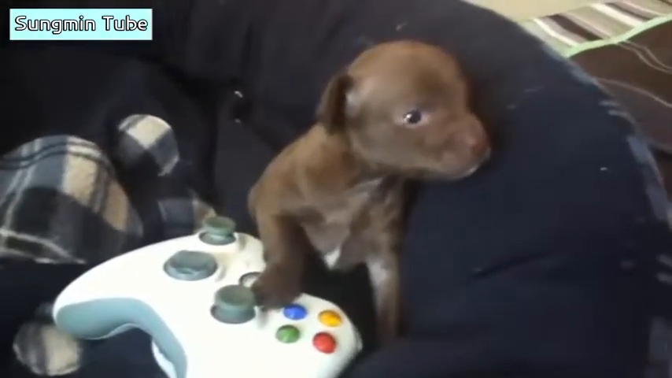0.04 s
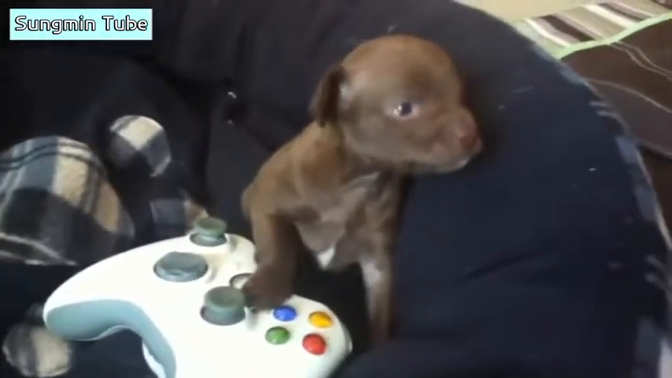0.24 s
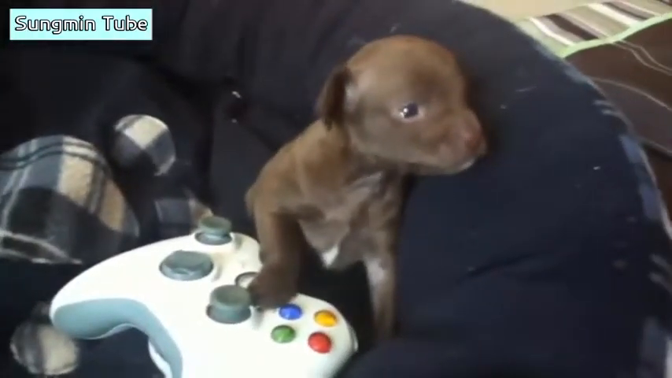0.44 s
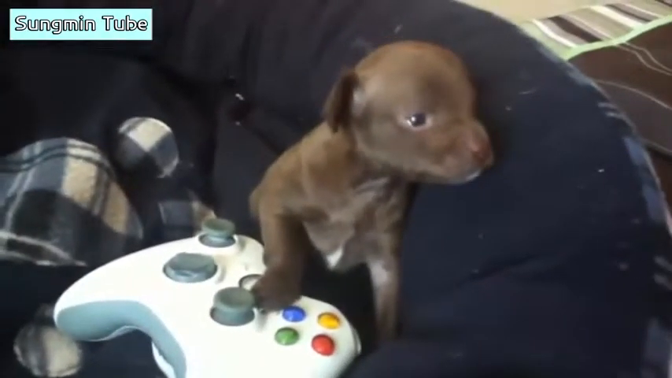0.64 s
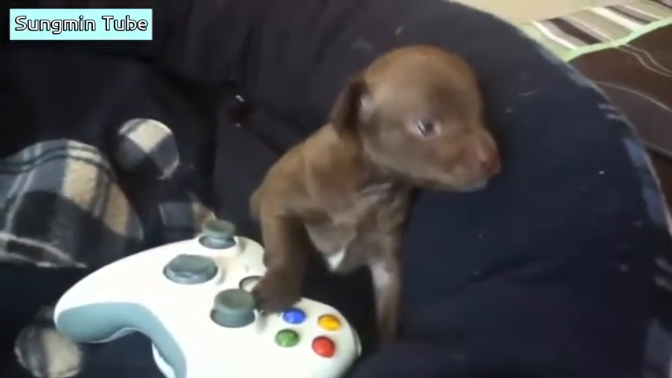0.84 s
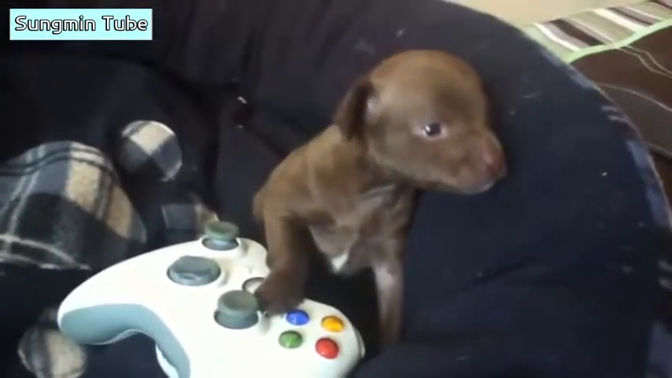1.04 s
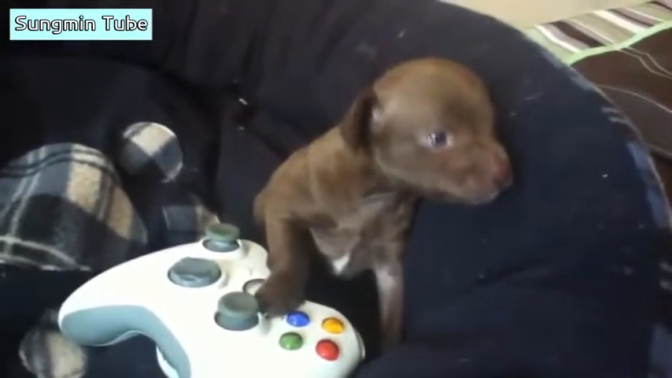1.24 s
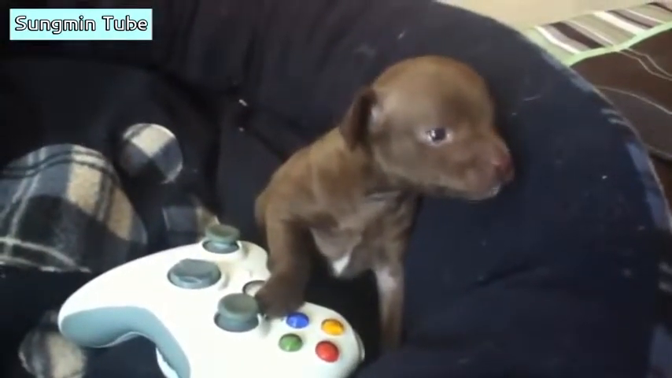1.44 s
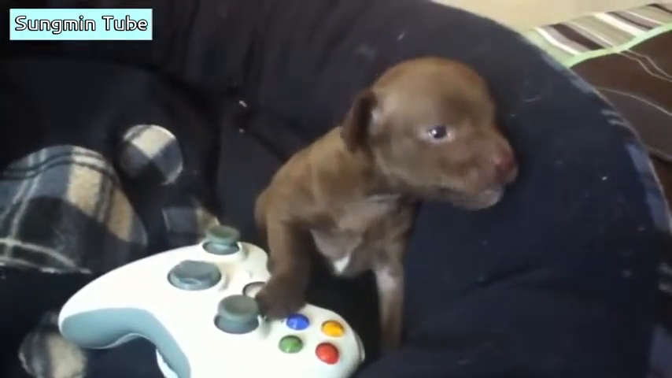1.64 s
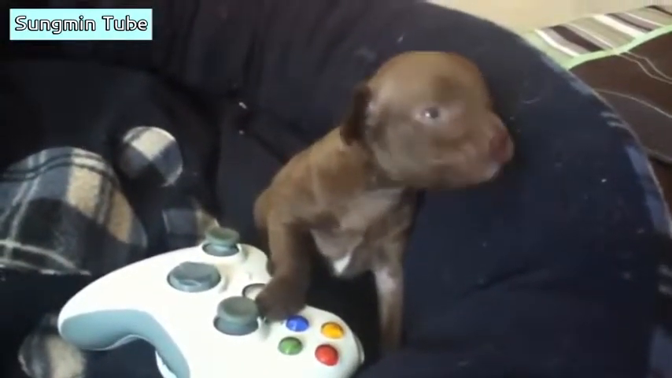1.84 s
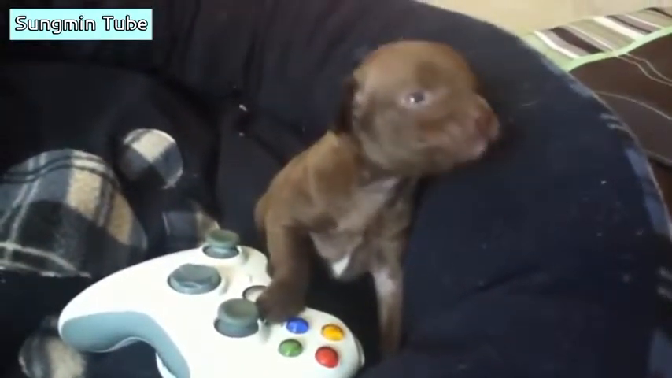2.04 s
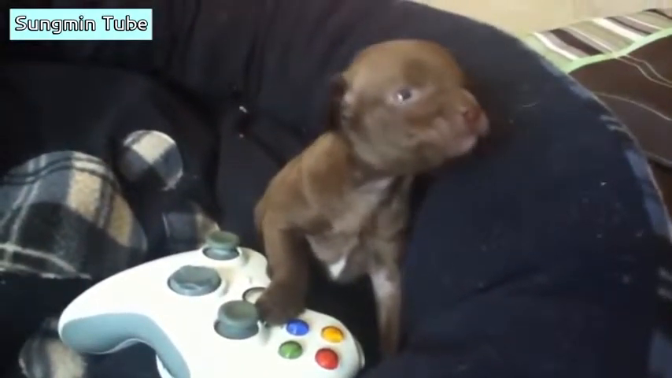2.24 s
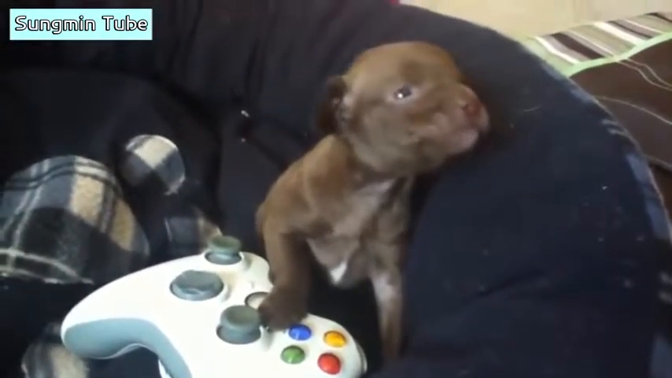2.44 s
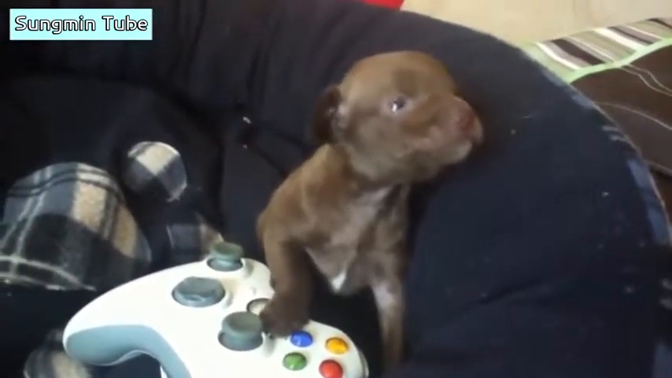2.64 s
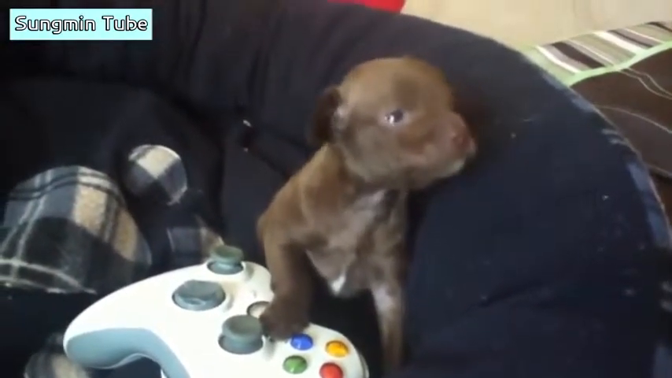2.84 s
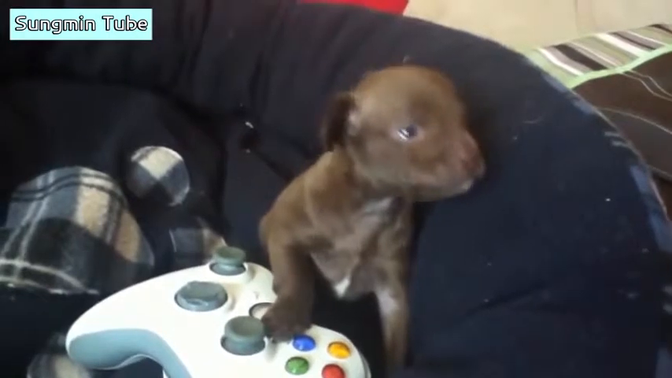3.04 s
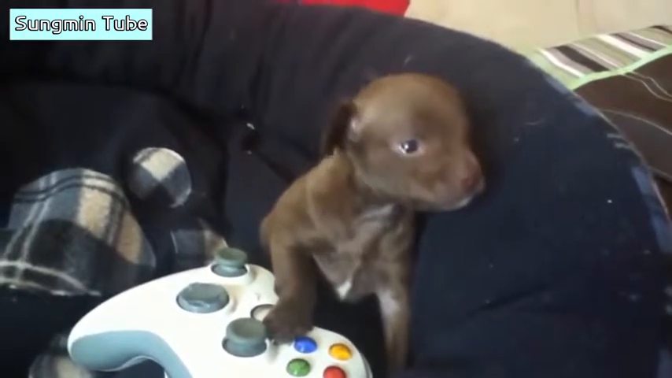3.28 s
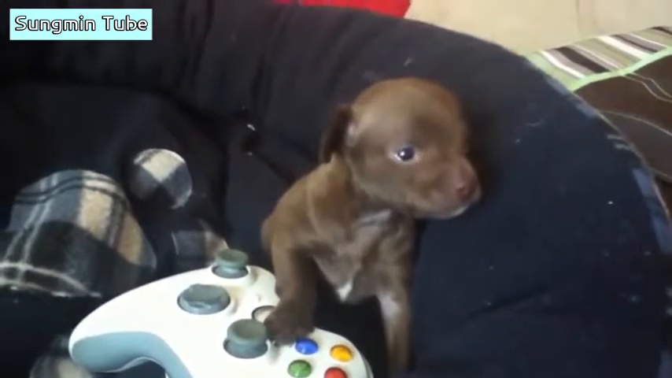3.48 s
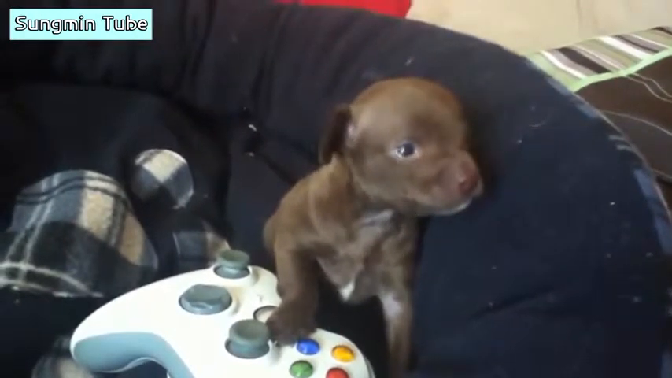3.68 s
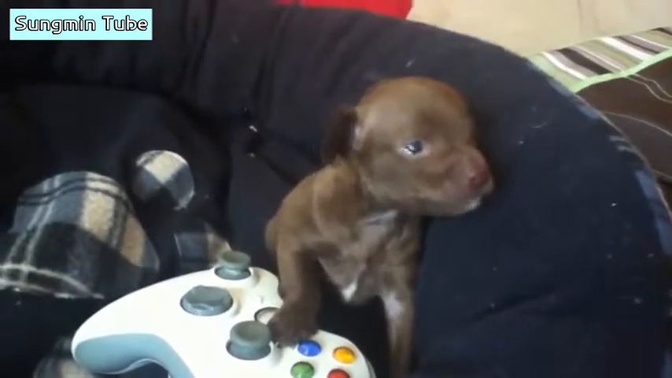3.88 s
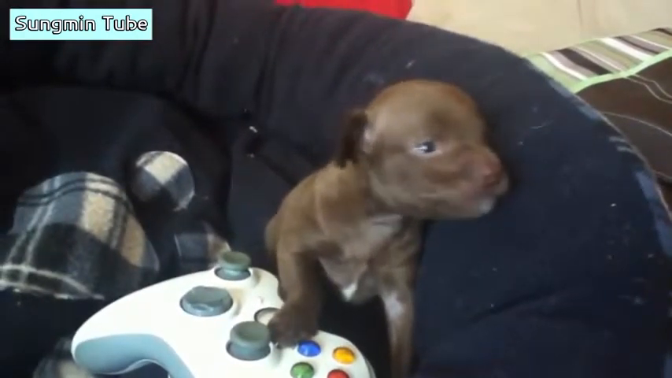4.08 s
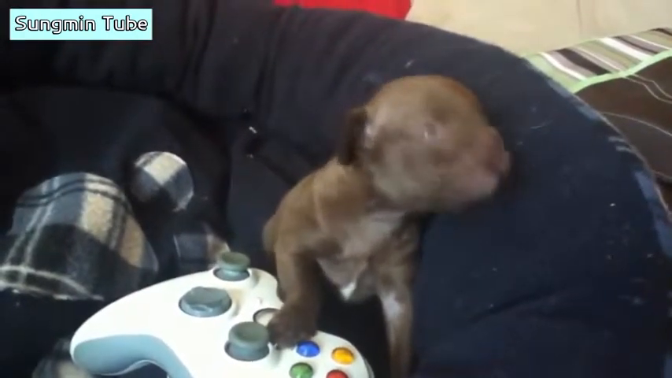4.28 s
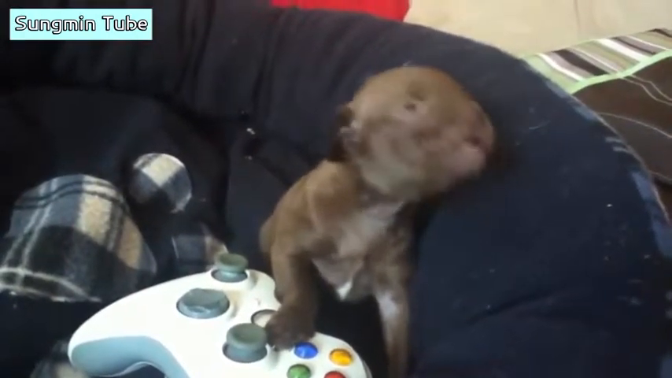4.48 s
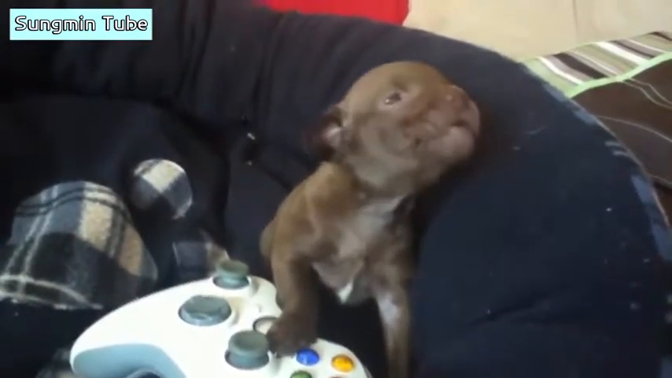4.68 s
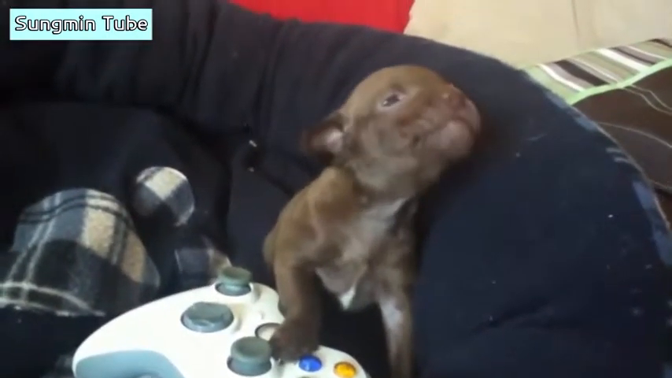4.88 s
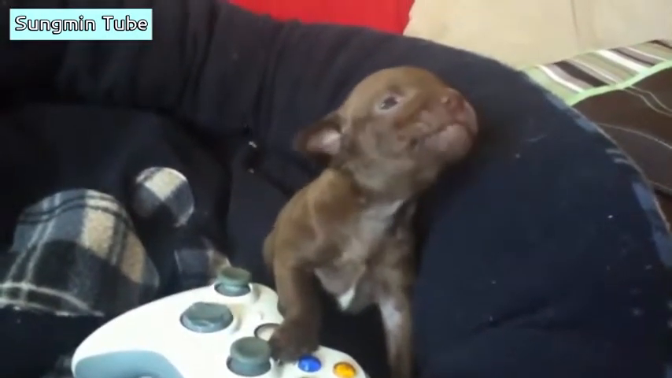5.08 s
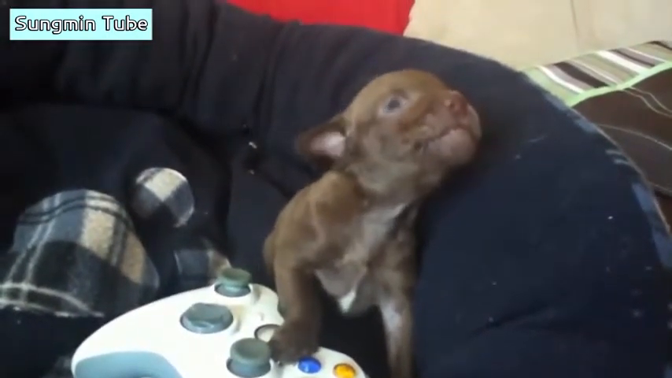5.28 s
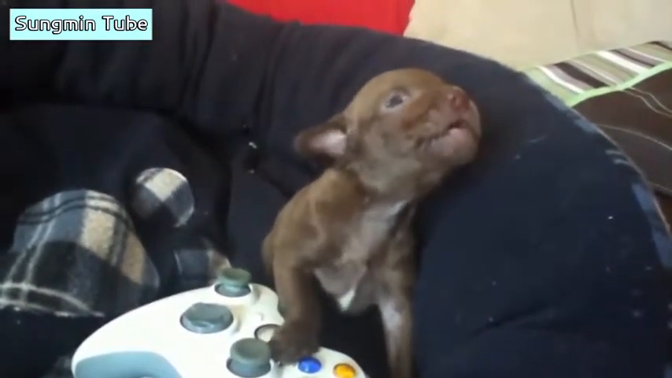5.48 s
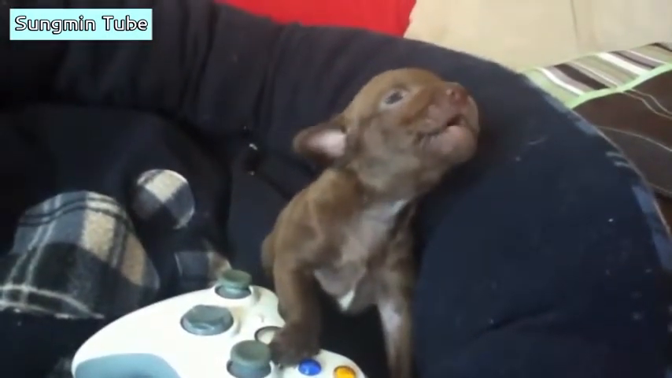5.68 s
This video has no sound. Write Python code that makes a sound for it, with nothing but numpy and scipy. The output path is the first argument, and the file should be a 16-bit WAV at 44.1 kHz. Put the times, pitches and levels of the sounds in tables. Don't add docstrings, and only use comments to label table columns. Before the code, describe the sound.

A very young puppy is heard close up in a small, softly furnished room, over a faint low appliance hum and steady microphone hiss. At 0 to 0.4 s come tiny, muffled closed-mouth grunts, with a slight handling rumble after them. A brief low groan follows at 0.9 s, then a small yip at 1.4 s and a rising one at 1.6 s. At 1.8 s a squeak shoots up into a loud, rough, piercing yelp, peaking around 1.95 s, then cracks down to a falling nasal whine ending at 2.1 s. Faint grunts come at 2.5, 2.7 and 2.9 s, a soft nasal snuffle around 3.1 to 3.2 s, and three more grunts from 3.5 to 3.9 s. A short grumble at 4.1 s leads to a howl at 4.3 s, which climbs with breaks, holds high and clear, then slides down and fades by 5.1 s. After quiet breathing, another low howl starts rising at 5.6 s and is cut off.

```python
import sys
import numpy as np
from scipy import signal
from scipy.fft import rfft, irfft, next_fast_len
from scipy.io import wavfile
from scipy.ndimage import uniform_filter1d, minimum_filter1d, map_coordinates

SR = 44100
rng = np.random.default_rng(int(sys.argv[2]) if len(sys.argv) > 2 else 0)


def invert_db(x):
    u = np.asarray(x, float) / 20
    return 10 ** u


def store_wav(level_fs):
    pcm = np.round(np.clip(np.atleast_2d(level_fs), -1, 1) * 32767)
    wavfile.write(sys.argv[1], SR, pcm.T.astype(np.int16))


N = 252246
CUTOFF_HZ = 15720

# (frequency [Hz], level [dB])
THROAT_SHUT = [(120, -9), (240, 3), (600, 0), (1100, 2), (1350, -2), (1600, -5.5), (2150, 6.5),
               (2600, -6.5), (2900, -13), (3600, -22.5), (4400, -18), (6600, -30), (8200, -11.5),
               (15500, -28)]
# (frequency [Hz], level [dB])
THROAT_OPEN = [(100, 6), (500, -2.5), (1100, 4.5), (1900, 3), (2600, -18.5), (3100, -10), (3500, -7),
               (3800, -15), (4700, -23.5), (5400, -32), (6600, -23), (8200, -6.5), (12000, -26),
               (14000, -39)]


def voice():
    rasp_db, hiss_db = -6.5, -27.0
    bright_base_db, bright_per_effort, bright_per_level = -4.5, -0.18, 0.98
    squeal_hz, squeal_dull_db = 1180, 7
    phrases = cries()
    rows = np.array(sorted(row for phrase in phrases for row in phrase))
    t = np.arange(N) / SR
    controls = [np.interp(t, rows[:, 0], c) for c in rows[:, 1:].T]
    pitch_hz, level_db, effort_db, mouth = uniform_filter1d(controls, round(.004 * SR))
    mouth = np.clip(mouth, 0, 1)
    times = [(p[0][0] - .003, p[-1][0] + 0.0014) for p in phrases]
    sounding = spans(times, np.ones(len(phrases)), 0.004)

    wander = drift(14, count=9) * .8 + drift(55, count=9) * .6
    tremor = np.roll(wander[0], N // 3) * np.sin(2 * np.pi * 45 * t)
    pitch_hz = pitch_hz * (1 + .005 * drift(28, count=1)[0] + .0025 * tremor)
    chaos, depth, divisor = beat_breaks()

    bright_db = bright_base_db + bright_per_effort * (effort_db + 7.5)
    bright_db += bright_per_level * np.minimum(level_db + 9.5, 0) * mouth
    squeal = np.clip((pitch_hz - squeal_hz) / 150 + 1, 0, 1)
    bright_db -= squeal_dull_db * squeal * (1 + 0.51 * chaos)

    cycles = np.cumsum(pitch_hz) / SR
    chance = signal.hilbert(rng.standard_normal(8192))
    strong, early = [map_coordinates(c, [cycles], order=3) for c in (chance.real, chance.imag)]
    subtone = 2 * np.pi * cycles / divisor
    slip_cycles = (.0012 + .13 * chaos) * early + .085 * depth * np.sin(subtone)
    folds = harmonic_stack(sounding, pitch_hz, effort_db, bright_db, mouth, chaos, wander, cycles, slip_cycles)
    folds *= 1 + (.02 + .2 * chaos) * np.tanh(strong)
    folds *= 1 + .62 * depth * np.cos(subtone)

    puff = 1 + 0.15 * np.cos(2 * np.pi * cycles)
    rasp = coloured_noise([(300, -9.0), (1000, 1.0), (3900, -14.0), (5000, -16.0)])
    folds += invert_db(rasp_db) * chaos * puff * rasp
    folds *= invert_db(level_db + .9 * drift(30, count=1)[0]) * sounding
    hiss = coloured_noise([(6000, -48), (7200, -4), (8300, -2.5), (10000, -20), (12500, -0.5),
                           (14500, -18), (16000, -20)])
    hiss *= puff * invert_db(level_db + bright_db + hiss_db) * sounding
    hiss *= 0.043 + 0.52 * (1 - mouth) + uniform_filter1d(chaos, round(.03 * SR))

    pressure = invert_db(level_db) * sounding * np.minimum(0.11 + chaos, 1)
    through_throat = filtered(folds * mouth, THROAT_OPEN) + filtered(folds * (1 - mouth), THROAT_SHUT)
    return through_throat + hiss, pressure, sounding


def cries():
    # (start [s], length [s], peak [dB], pitch [Hz], sag [Hz])
    whimpers = [(-.02, 0.033, -35, 241.3, 20), (0.201, 0.036, -31, 337.8, 70),
                (0.397, 0.026, -29, 285.2, 16), (2.482, 0.024, -34, 289.7, 5.5),
                (2.693, 0.05, -29, 293, 4.1), (2.907, 0.028, -29, 280.5, 21),
                (3.523, 0.025, -33.5, 301, 4.1), (3.732, 0.027, -30.5, 316.4, 12.3),
                (3.922, 0.032, -28, 334.8, 28)]
    # (time [s], pitch [Hz], level [dB], effort [dB/octave], mouth [0 shut to 1 open])
    groan = [(.851, 266.9, -49, -10, 0.085), (.859, 278.7, -32.5, -8.5, 0.0795),
             (.88, 307.8, -26.5, -9, .08), (.908, 261.2, -34.5, -11.5, 0.072), (.924, 245, -30, -15, 0.048),
             (.935, 234.5, -57, -14, .08)]
    grumble = [(4.086, 347.7, -59, -9, 0.13), (4.091, 355.4, -28.5, -5, .12), (4.104, 369.3, -25, -9, .12),
               (4.126, 365.5, -21.5, -10.5, .12), (4.138, 336, -21.5, -12.5, .12),
               (4.143, 293.5, -34, -3.5, 0.14), (4.152, 290, -36, -12, .12), (4.157, 285, -52, -14, .12)]
    yip = [(1.383, 384.6, -42, -7, 0.1), (1.391, 425.7, -24, -12, 0.11), (1.406, 507, -23.5, -7, .11),
           (1.416, 463, -21.5, -5.5, 0.1), (1.42, 425, -24.5, -11, 0.073), (1.426, 420, -32, -11, .09),
           (1.432, 420.5, -57, -3, 0.097)]
    second_yip = [(1.569, 275.8, -46, -13, .06), (1.582, 325.4, -26.5, -6.5, .06),
                  (1.606, 395.5, -22.5, -6, 0.058), (1.627, 436.6, -18.5, -10, 0.055),
                  (1.645, 421.2, -22.5, -8.5, 0.062), (1.654, 342, -26, -13, 0.062),
                  (1.659, 317, -30, -21, 0.066)]
    # (time [s], pitch [Hz], level [dB], effort [dB/octave], mouth [0-1])
    yelp_rise = [(1.798, 327.6, -37, -15, 0.068), (1.802, 342, -35, -9, 0.068),
                 (1.817, 394, -21, -9.5, 0.071), (1.865, 753.8, -14, -7, 0.083)]
    yelp = [(1.871, 925, -14, -2.5, 0.47), (1.886, 1000, -11, -10.5, 0.65), (1.897, 1202, -12.5, -4, 0.73),
            (1.928, 1237, 1.5, -3.5, 0.95), (1.937, 1200, -7, -3.5, 0.87), (1.943, 1032, -12, -6, 0.71),
            (1.95, 1398, 0, -3, 0.65), (1.954, 1250, -9.5, -2.5, 0.52), (1.959, 1234, -2, -3.5, 0.69)]
    yelp_tail = [(1.963, 650, -13.5, -7.5, 0.3), (1.975, 600.5, -17, -8, .09),
                 (2, 548.4, -16.5, -10.5, 0.098), (2.05, 499.6, -16.5, -10, 0.078),
                 (2.081, 465, -17.5, -11, 0.073), (2.093, 405.5, -19.5, -9.5, 0.057),
                 (2.103, 350.5, -40, -9, 0.058)]
    # (time [s], pitch [Hz], level [dB], effort [dB/octave], mouth [0-1])
    howl_onset = [(4.29, 355.3, -39, -8, 0.11), (4.297, 366.3, -23.5, -10.5, 0.096),
                  (4.332, 492.7, -17, -11.5, 0.054), (4.384, 607, -17.5, -7.5, 0.091),
                  (4.389, 767, -17.5, -7, 0.36), (4.42, 785, -14.5, -8.5, 0.25),
                  (4.428, 716, -19.5, -7.5, 0.41), (4.436, 655, -17.5, -8, 0.5),
                  (4.459, 590, -17.5, -8, 0.55), (4.479, 612, -18, -6.5, 0.7), (4.484, 630, -20, -6, 0.52),
                  (4.49, 679, -17, -8.5, .45)]
    howl = [(4.503, 809.6, -15, -8, 0.4), (4.52, 853, -11.5, -8.5, 0.16), (4.56, 900, -13, -7.5, 0.38),
            (4.604, 900, -13, -7.5, 0.52), (4.64, 934, -13.5, -6.5, 0.31), (4.68, 969, -15, -6.5, 0.57),
            (4.738, 956.4, -15, -5, 1), (4.818, 931, -18.5, -3, 0.99), (4.858, 917.6, -14, -8.5, 0.362)]
    howl_fall = [(4.889, 872, -16.5, -4, 0.97), (4.915, 868, -17, -4.5, 0.88),
                 (4.94, 816.4, -15.5, -5, 0.87), (4.98, 811.6, -17.5, -5, 1), (5.008, 744, -22.5, -4, 0.86),
                 (5.015, 733, -20, -6, 0.91), (5.024, 701, -21.5, -5, 0.81),
                 (5.041, 667.5, -23.5, -4.5, 0.98), (5.067, 678, -26.5, -6.5, 0.98),
                 (5.071, 699, -29, -8, .8), (5.074, 834, -26.5, -14, 0.45), (5.08, 817, -31, -18, .4),
                 (5.083, 704, -35, -20, 0.36), (5.098, 690, -42, -20, .33)]
    next_howl = [(5.585, 315, -55, -11, 0.11), (5.591, 320.5, -28.5, -12.5, 0.093),
                 (5.617, 353.6, -23.5, -9.5, 0.14), (5.678, 368.7, -22.5, -10.5, 0.27),
                 (5.7, 410.5, -21, -7.5, 0.23), (5.72, 465.6, -18.5, -10, 0.21)]
    phrases = [short_cry(w) for w in whimpers]
    phrases += [groan, grumble, yip, second_yip]
    phrases += [yelp_rise + yelp + yelp_tail, howl_onset + howl + howl_fall, next_howl]
    return phrases


def short_cry(row):
    attack_s, release_s, fade_db, droop_db = 0.0049, 0.0098, 23, 3.5
    top_at, loudest_at = 0.247, 0.61
    scoop = .2
    grunt_effort_db, effort_per_level, nearly_shut = -11, 0.23, 0.34
    start, length, peak_db, top_hz, sag_hz = row
    t = np.linspace(0, length, num=19)
    rising = t / (top_at * length) - 1
    falling = (t / length - top_at) / (1 - top_at)
    away = np.where(t < top_at * length, rising, falling)
    pitch_hz = top_hz - sag_hz * away ** 2 * np.where(away < 0, scoop, 1)
    fade = np.maximum(1 - t / attack_s, 0) ** 2 + np.maximum(1 - (length - t) / release_s, 0) ** 2
    level_db = peak_db - fade_db * fade - droop_db * (2 * (t / length - loudest_at)) ** 2
    effort_db = grunt_effort_db + effort_per_level * (peak_db + 27)
    return [(start + s, f, d, effort_db, nearly_shut) for s, f, d in zip(t, pitch_hz, level_db)]


def beat_breaks():
    # (start [s], end [s], chaos [0-1], subtone depth [0-1], subtone period [cycles])
    breaks = [(.195, .24, .08, 0, 2), (.39, .425, .12, 0, 2), (.85, .935, .04, 0, 2),
              (4.29, 4.382, .1, 0, 2), (4.402, 4.427, .07, .05, 3), (4.427, 4.45, .12, .1, 3),
              (1.412, 1.421, .4, .6, 2), (1.612, 1.65, .05, .7, 2), (1.866, 1.9, .7, .5, 3),
              (1.9, 1.922, .75, .3, 2), (1.922, 1.946, .1, .03, 2), (1.946, 1.954, .55, .5, 3),
              (1.954, 1.961, .4, .8, 2), (1.8, 1.866, .1, 0, 2), (1.962, 1.986, .05, .05, 2),
              (1.986, 2.02, .05, .1, 2), (2.02, 2.088, .03, .03, 2), (2.088, 2.105, .35, .2, 2),
              (4.136, 4.155, .2, .1, 2), (4.383, 4.402, .35, .5, 3), (4.45, 4.474, .14, .4, 2),
              (4.474, 4.5, .4, .55, 3), (4.5, 5.072, .006, 0, 2), (5.072, 5.082, .25, .5, 2),
              (2.68, 2.96, .06, 0, 2), (3.5, 3.97, .1, 0, 2), (4.08, 4.136, .04, 0, 2)]
    times = [b[:2] for b in breaks]
    chaos, depth = [spans(times, [b[k] for b in breaks], .008) for k in (2, 3)]
    divisor = np.where(spans(times, [b[4] for b in breaks], 1 / SR) > 2.5, 3, 2)
    return chaos, depth, divisor


def harmonic_stack(sounding, pitch_hz, effort_db, bright_db, mouth, chaos, wander, cycles, slip_cycles):
    # (centre [Hz], width [Hz], gain [dB], start [s], end [s])
    pockets = [(3756, 96, -3.5, 4.3, 4.86), (3520, 200, -14, 4.545, 4.58), (5600, 410, 0, 4.5, 4.3),
               (11000, 3100, 6.5, 4.55, 4.98), (1000, 150, 5.5, .19, .24), (650, 120, -2, .19, .24),
               (840, 130, 7, .39, .43), (570, 100, -7, 0.36, 0.47), (890, 150, 4.5, .85, .94),
               (1482, 153, 3.5, 4.08, 4.16), (2112, 140, 6, 4.08, 4.108), (2180, 450, -14, 3.4, 4.16),
               (1953, 220, 4, 4.425, 4.45), (2090, 440, -8, 1.57, 1.8), (2320, 220, 2, 1.965, 2.03),
               (3150, 250, 11, 1.99, 2.055), (2030, 150, 0.5, 5.5, 4.9), (1800, 325, -24, 1.825, 1.866),
               (567, 99, -11, .85, .94), (1610, 210, -19, 1.4, 1.67), (1550, 130, -6, 1.2, 1.6),
               (2360, 227, -13, 1.4, 1.4), (2130, 170, 2.5, 1.936, 1.947), (3140, 210, 4.5, 1.936, 1.947),
               (860, 151, 7.5, 5.58, 5.72), (1157.5, 120, -5.5, 5.58, 5.72), (8680, 280, -6.5, 4.1, 4.99),
               (580, 100, -13, 2.47, 2.52), (870, 110, -3, 2.68, 2.76), (1160, 117, 5, 2.68, 2.76),
               (852, 110, 5, 2.9, 2.95), (1133, 114, -8, 2.9, 3.8), (570, 90, -10, 2.9, 2.95),
               (4583, 720, -4.5, 4.8, 5), (1240, 270, -5, .85, 0.87), (2764, 270, 3, 3.4, 5.09)]
    lost_db, spread_rad = 4.5, -0.4
    on = np.flatnonzero(sounding > 0)
    tone, heard_power = np.zeros(len(on)), 1e-12
    for k in range(1, 25):
        partial_hz = k * pitch_hz[on]
        source_db = effort_db[on] * np.log2(min(k, 6))
        source_db = source_db + bright_db[on] * (partial_hz > 6000)
        source_db = source_db + 3 * wander[k % 9, on] * min(k - 1, 3) / 3
        source_db = source_db - lost_db * chaos[on] * (k > 3)
        for pocket_hz, width_hz, pocket_db, start, end in pockets:
            held = slice(*np.searchsorted(on, [start * SR, end * SR]))
            source_db[held] += pocket_db * np.exp(-((partial_hz[held] - pocket_hz) / width_hz) ** 2)
        gain = invert_db(source_db - 2.5 * max(k - 14, 0)) * (partial_hz < CUTOFF_HZ)
        blur = k ** .8
        phase = 2 * np.pi * (k * cycles[on] + blur * slip_cycles[on]) - spread_rad * k ** 2
        tone += gain * np.cos(phase)
        throat = mouth[on] * invert_db(at_hz(THROAT_OPEN, partial_hz))
        throat += (1 - mouth[on]) * invert_db(at_hz(THROAT_SHUT, partial_hz))
        heard_power = heard_power + (gain * throat) ** 2 / 2
    folds = np.zeros(N)
    folds[on] = tone / np.sqrt(heard_power)
    return folds


def muffled(x, rows):
    result = x.copy()
    for start, end, low_hz, high_hz, gain_db in rows:
        near = slice(round((start - .05) * SR), round((end + .05) * SR))
        bandpass = signal.butter(6, [low_hz, high_hz], "band", fs=SR, output="sos")
        band = signal.sosfiltfilt(bandpass, x[near])
        result[near] += (invert_db(gain_db) - 1) * spans([(start, end)], [1], .006)[near] * band
    return result


def gust():
    # (start [s], end [s], level [dB])
    rush = (1.85, 1.915, -38)
    swell = spans([rush[:2]], [invert_db(rush[2])], 0.043)
    return swell * coloured_noise([(3000, -18), (4600, 3.0), (5800, -8), (6600, -26), (7500, 4.0),
                                   (9500, -3), (13000, -10), (15500, -22)])


def breathing(pressure, sounding):
    # (frequency [Hz], width [Hz], level [dB])
    nose = [(840, 520, -4.5), (1306, 890, -1.5), (1866, 42, -5.5), (2020, 540, -7), (3200, 2200, -6.5)]
    # (start [s], end [s], level [dB])
    breaths = [(0, 0.15, -53.5), (0.56, 0.819, -52), (1.303, 1.682, -51.5), (1.996, 2.195, -49),
               (2.762, 3.523, -52.5), (3.877, 4.45, -55), (5.351, 5.72, -54)]
    # (time [s], level [dB])
    snuffle_points = [(3.0, -55), (3.08, -50), (3.13, -42), (3.16, -49), (3.2, -40.5), (3.24, -58),
                      (3.35, -51)]
    # (frequency [Hz], width [Hz], level [dB])
    snout = [(690, 110, -20), (1040, 230, 10.5), (1320, 130, 15.5), (2050, 131, 8.5), (2830, 150, 1.5)]
    swell_s, resting_db, leak_db = 0.33, -60.5, -18.5
    t = np.arange(N) / SR
    swell = invert_db(resting_db) + spans([b[:2] for b in breaths], [invert_db(b[2]) for b in breaths], swell_s)
    flow = swell * (1 - 0.17 * sounding) + invert_db(leak_db) * pressure
    snuffle_db = np.interp(t, *np.transpose(snuffle_points), left=-120, right=-120)
    snuffle = rms_one(resonant_noise(snout)) * invert_db(snuffle_db)
    return rms_one(resonant_noise(nose)) * flow + snuffle


def room(x):
    t60_s, wet_db, echo_s, echo_db = .25, -24.5, .072, -35
    t = np.arange(round(.5 * SR)) / SR
    tail = rng.standard_normal(len(t)) * invert_db(-60 * t / t60_s) * (t > .006)
    tail[round(echo_s * SR)] += invert_db(echo_db - wet_db) * np.sqrt(np.sum(tail ** 2))
    tail = signal.lfilter([1], [1, -.6], tail)
    return invert_db(wet_db) * signal.fftconvolve(x, tail / np.sqrt(np.sum(tail ** 2)))[:N]


def handling():
    # (start [s], end [s], level [dB])
    bumps = [(0.336, 0.52, -52), (1.864, 1.94, -53), (4.1, 4.195, -58), (5.661, 5.71, -62)]
    swell = spans([b[:2] for b in bumps], [invert_db(b[2]) for b in bumps], 0.065)
    return swell * coloured_noise([(15, -15), (30, 8.0), (60, 10), (200, -4), (400, -64)])


def hum_and_hiss():
    # (frequency [Hz], level [dB])
    floor_spectrum = [(12, -40), (20, -37), (137, -5.5), (181, -13), (245, -14), (343, -12.5), (707, -19),
                      (790, -21.5), (908, -19.5), (1040, -21), (1130, -21.5), (3360, -29.5), (11100, -34.5),
                      (15600, -42)]
    # (frequency [Hz], width [Hz], level [dB])
    drone = [(131.9, 6.5, -60.5), (253.4, 41, -55.5)]
    return invert_db(-45.5) * mottled(coloured_noise(floor_spectrum)) + resonant_noise(drone)


def mottled(x):
    mottle_db = 3.0
    cells = signal.stft(x, nperseg=1024)[2]
    blotches = uniform_filter1d(rng.standard_normal(cells.shape), size=3, axis=0) * np.sqrt(3)
    return rms_one(signal.istft(cells * invert_db(mottle_db * blotches), nperseg=1024)[1][:N])


def rms_one(x):
    return x / np.sqrt(np.mean(x ** 2) + 1e-20)


def at_hz(points, freq_hz):
    points = np.array(points)
    return np.interp(np.log(freq_hz), np.log(points[:, 0]), points[:, 1])


def filtered(x, spectrum):
    size = next_fast_len(N + 4096)
    freq_hz = np.maximum(np.arange(size // 2 + 1) * SR / size, 1)
    return irfft(rfft(x, size) * invert_db(at_hz(spectrum, freq_hz)), size)[:N]


def coloured_noise(spectrum):
    return rms_one(filtered(rng.standard_normal(N), spectrum))


def resonant_noise(modes):
    total = 0
    for mode_hz, width_hz, level_db in modes:
        r = np.exp(-np.pi * width_hz / SR)
        poles = [1, -2 * r * np.cos(2 * np.pi * mode_hz / SR), r * r]
        once = signal.lfilter([1, 0, -1], poles, rng.standard_normal(N))
        twice = signal.lfilter([1, 0, -1], poles, once)
        total = total + invert_db(level_db) * rms_one(twice)
    return total


def spans(rows, values, fade_s):
    held = np.zeros(N)
    for (start, end), value in zip(rows, values):
        held[max(round(start * SR), 0):round(end * SR)] = value
    return uniform_filter1d(held, round(fade_s * SR), mode="nearest")


def drift(rate_hz, count):
    steps = rng.standard_normal((count, 400))
    at = np.minimum(np.arange(N) / SR * rate_hz, 398)
    return np.array([map_coordinates(s, [at], order=3) for s in steps])


def scene():
    # (start [s], end [s], low [Hz], high [Hz], gain [dB])
    muffles = [(1.913, 1.985, 4200, 7000, -26), (1.385, 1.43, 2700, 6800, -18),
               (4.29, 4.5, 2650, 6800, -8.5), (4.445, 4.5, 160, 450, -8), (1.57, 1.665, 2330, 6800, -12),
               (1.57, 1.61, 1750, 2330, -5), (4.99, 5.02, 2600, 3300, -6), (1.8, 1.858, 2850, 4500, -10),
               (1.965, 2.11, 2450, 2900, -7), (2.055, 2.11, 2900, 4200, -6), (1.93, 1.975, 7000, 11000, -6),
               (5.02, 5.09, 2350, 4000, -8), (2.082, 2.11, 1400, 2700, -9), (5.0, 5.09, 9000, 13000, -9),
               (4.65, 4.86, 3550, 4150, -8), (4.545, 4.58, 3300, 3900, -7), (1.975, 2.085, 1420, 1780, -6),
               (5.076, 5.1, 950, 2200, -7), (1.866, 1.962, 2250, 2900, 5), (1.902, 1.926, 3500, 4250, 4),
               (1.875, 1.9, 2900, 4500, 3), (1.41, 1.424, 600, 1000, 4), (4.436, 4.446, 3100, 3450, 5),
               (4.467, 4.483, 3050, 3500, 6), (4.405, 4.42, 2900, 3300, 5), (1.946, 1.964, 3400, 4100, 4),
               (1.972, 2.04, 2050, 2450, 4), (2.04, 2.085, 1800, 2150, 3), (1.965, 2.04, 3400, 4200, -7),
               (1.934, 1.948, 1900, 2350, 4), (1.962, 1.98, 1450, 2200, -6), (4.43, 4.447, 1850, 2200, 4),
               (4.472, 4.484, 1850, 2200, 5), (4.383, 4.405, 160, 450, -8), (4.6, 5.0, 5250, 6200, -7),
               (4.45, 4.5, 3500, 4500, 6), (4.375, 4.405, 3500, 4600, 5), (.85, .93, 1050, 1350, -5),
               (1.385, 1.425, 1250, 1600, 4)]
    # (start [s], end [s], low [Hz], high [Hz], gain [dB])
    thinned = [(1.845, 1.98, 6250, 6900, -14), (1.97, 2.07, 5700, 6600, -6), (4.4, 4.66, 6300, 7100, -6)]
    puppy, pressure, sounding = voice()
    no_bass = signal.butter(2, 120, "high", fs=SR, output="sos")
    puppy = signal.sosfiltfilt(no_bass, muffled(puppy, muffles)) + gust()
    background = hum_and_hiss() + handling()
    mix = puppy + room(puppy) + breathing(pressure, sounding) + background
    return muffled(mix, thinned)[None, :]


def top_cut(x):
    return signal.sosfilt(signal.butter(12, 15700, fs=SR, output="sos"), x)


def record(dry):
    hold = round(.004 * SR)
    allowed = np.minimum(.9 / (np.abs(dry) + 1e-9), 1)
    gain = uniform_filter1d(minimum_filter1d(allowed, 2 * hold), hold)
    lowpass = signal.cheby2(12, 70, CUTOFF_HZ + 600, fs=SR, output="sos")
    return top_cut(signal.sosfilt(lowpass, dry * gain))


dry = scene()
out = record(dry)
store_wav(out)
```